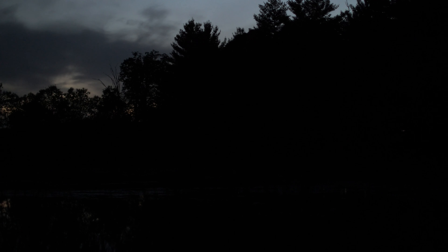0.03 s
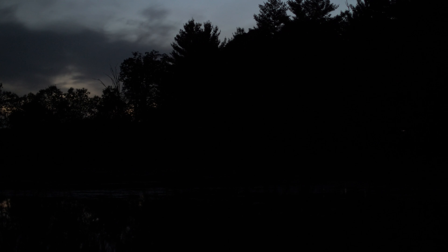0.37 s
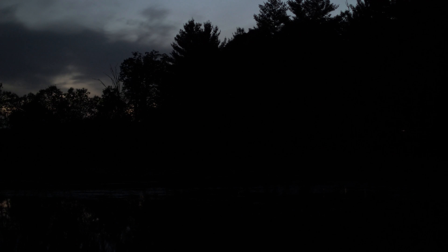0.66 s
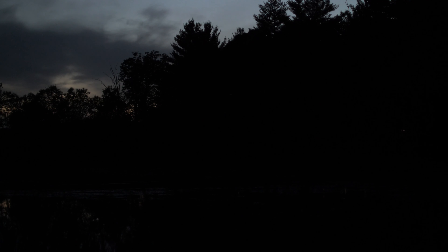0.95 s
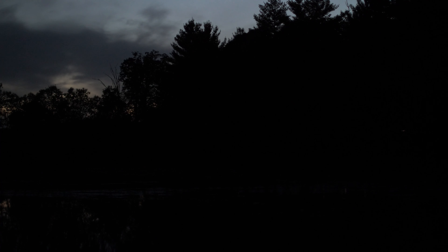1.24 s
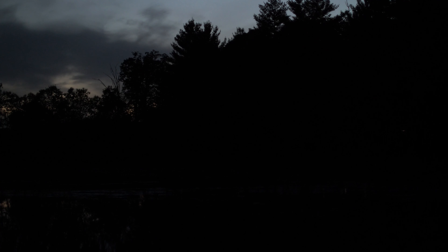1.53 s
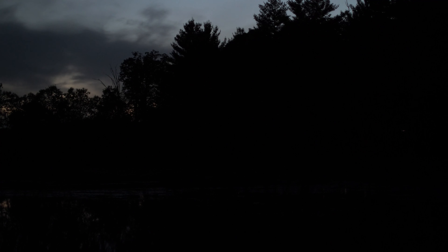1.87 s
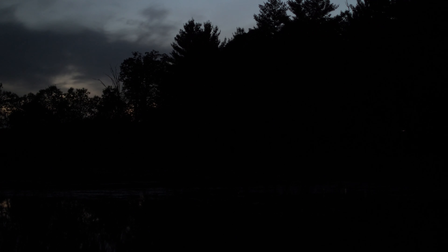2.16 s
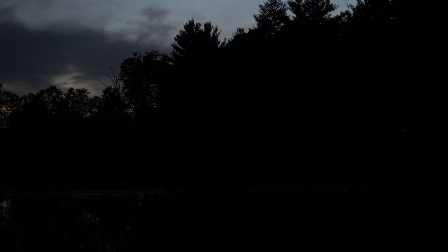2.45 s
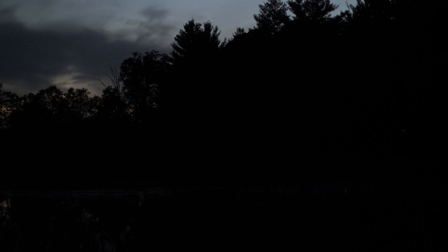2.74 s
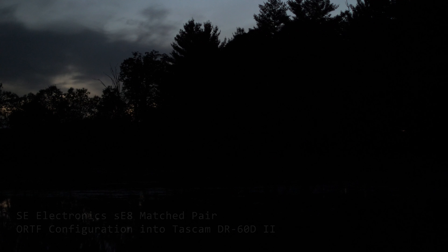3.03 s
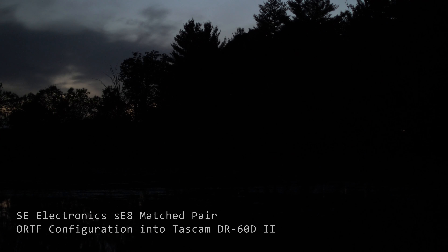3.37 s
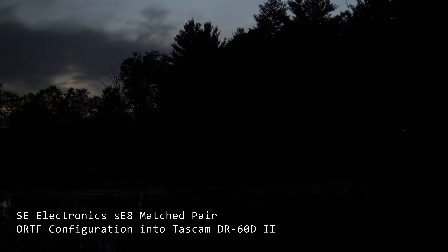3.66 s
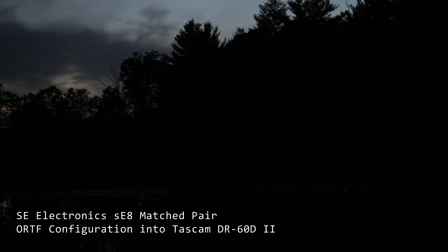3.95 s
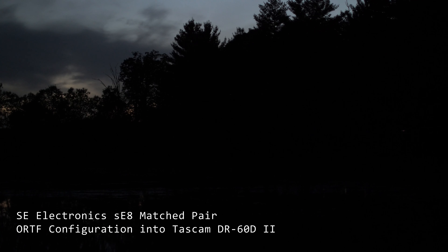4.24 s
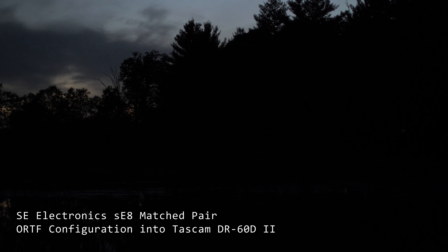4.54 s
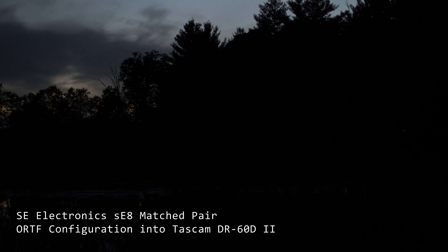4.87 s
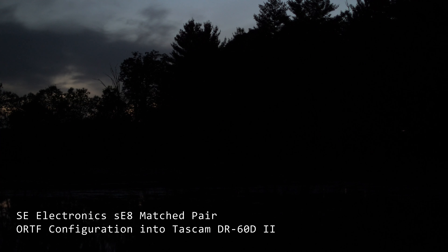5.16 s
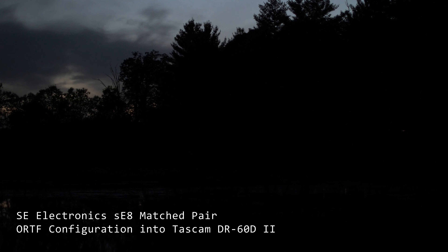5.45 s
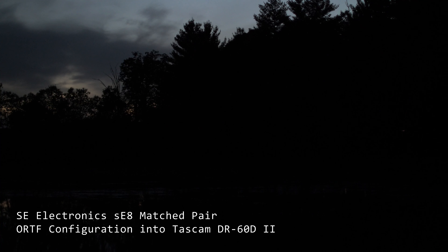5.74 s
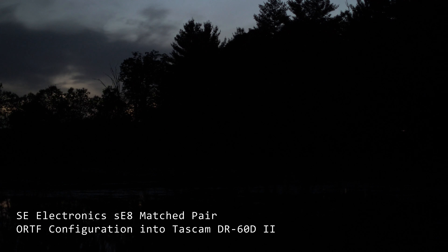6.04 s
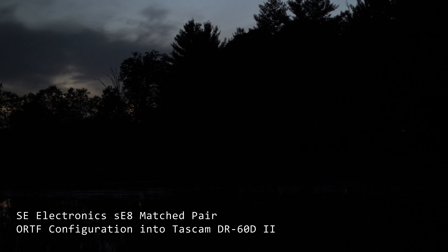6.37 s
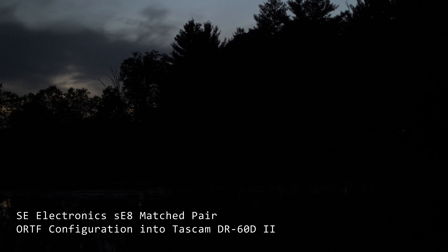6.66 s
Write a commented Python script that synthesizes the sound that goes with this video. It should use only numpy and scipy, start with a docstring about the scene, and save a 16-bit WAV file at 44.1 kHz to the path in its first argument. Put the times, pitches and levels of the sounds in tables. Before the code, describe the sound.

Near tree frogs trade pulsing trills and short upward whistles while a farther chorus swells and ebbs in still evening air.

```python
"""Tree frogs are already trilling across a wooded pond at dusk, over a distant rumble.
Each trill is a slowing train of short rising chirps. From the start the near frogs overlap, one gives
rising whistled weeps, and a far chorus swells and ebbs in bouts. Around 1 s a thin buzz comes and goes;
from about 3 s something hoots very faintly now and then. The frogs trill on to the end."""
import sys
import numpy as np
from scipy import signal
from scipy.fft import rfft, irfft
from scipy.io import wavfile

SR = 44100
rng = np.random.default_rng(int(sys.argv[2]) if len(sys.argv) > 2 else 0)


def store_wav(level_fs):
    """Save 16-bit WAV to argv[1]."""
    pcm = np.round(np.clip(np.atleast_2d(level_fs), -1, 1) * 32767)
    wavfile.write(sys.argv[1], SR, pcm.T.astype(np.int16))


N = 304290
TIME = np.arange(N) / SR

# Tone colour of a near frog's throat: f/Hz, level/dB
NEAR_THROAT = [(700, -23), (1000, -13), (1450, -10), (1750, -13), (2100, -2), (2400, 3.5), (2750, -6.5),
               (3100, -18), (3700, -21), (4200, -35.5), (4900, -32.5), (7200, -46.5), (9500, -45.5),
               (11000, -65), (15000, -70)]
# Near voices: level/dB, f/Hz, fundamental/dB, overtones/dB, upper throat resonance/dB, swell t/s
NEAR_VOICES = [ (-19, 1070, 1, 2, -4, .05), (-17.5, 1250, 2, -0.5, -5, 0.16),
               (-20.5, 1220, -7, 1.5, 6, 0.074), (-21.5, 1130, -3, -1.5, -1, 0.059),
               (-24, 1140, 3, 3.5, 2.5, 0.0175), (-18.5, 1185, 0.5, -1, 7, 0.09),
               (-19, 1170, -1, -0.5, -8.5, 0.13), (-15, 1130, -0.5, -5, 8.5, 0.26),
               (-22.5, 1300, -0.5, 1.5, 8.5, 0.085), (-24, 1400, -3, 0, -7, 0.1),
               (-18, 1400, 0, 0, -2, 0.044), ]
# Trill cues: first pulse t/s, last pulse t/s, pulse count, slowing (0-1), row of NEAR_VOICES
TRILL_CUES = [ (-.33, .078, 9, .05, 0), (.025, 1.601, 31, .2, 1), (.142, 1.174, 23, .13, 2),
              (1.372, 1.926, 11, .02, 3), (2.075, 2.735, 15, .15, 4), (2.152, 3.742, 32, .15, 5),
              (3.357, 4.651, 24, .02, 6), (3.49, 4.53, 20, .1, 3), (4.841, 6.17, 26, .16, 7),
              (5.08, 6.232, 22, .12, 8), (5.525, 6.147, 12, .02, 3), (6.268, 6.9, 13, .08, 9),
              (6.735, 7.33, 12, .1, 10), ]
def near_frogs(soft_start_db=-7, dull_start_db=-8, flat_start=0.0552, uneven_db=1, uneven_pitch=0.01485):
    """Each trill starts soft, dull and flat, and gains level, edge and pitch together."""
    out, pad_s = np.zeros(N), .1
    for first, last, pulses, slowing, frog in TRILL_CUES:
        db, hz, fundamental_db, overtones_db, upper_db, swell_s = NEAR_VOICES[frog]
        trill = np.zeros(int((last - first + 2 * pad_s) * SR))
        for s in pulse_times(0, last - first, pulses, slowing):
            slack = np.exp(-abs(s) / swell_s)
            louder, sharper, brighter = rng.standard_normal(3)
            pitch = hz * (1 - flat_start * slack + uneven_pitch * sharper)
            bright_db = overtones_db + dull_start_db * slack + uneven_db * brighter
            pulse = chirp(pitch, NEAR_THROAT, bright_db, upper_db, fundamental_db)
            gain = np.sqrt(2) * gain_of(db + soft_start_db * slack + uneven_db * louder)
            add(trill, pad_s + s - len(pulse) / SR / 2, gain * pulse)
        add(out, first - pad_s, bank_echoes(trill))
    return out


def pulse_times(first, last, count, slowing, jitter_s=.0007):
    """The pulses come quickly at first and spread out as the frog tires."""
    even = np.linspace(0, 1, int(round(count)))
    dragged = even + slowing * even * (np.sqrt(even) - 1)
    return first + (last - first) * dragged + jitter_s * rng.standard_normal(len(even))


def chirp(hz, throat, overtones_db=0, upper_db=0, fundamental_db=0,
          rise_s=.015, fall_s=.0095, glide_per_s=10, flick_per_s=5, rough=.011, edge_db=6):
    """One pulse, centred on its peak: it climbs and brightens as it swells, then flicks up as it shuts."""
    t = np.arange(-900, 900) / SR
    swell = np.exp(-(t / np.where(t < 0, rise_s, fall_s)) ** 2) * signal.windows.tukey(len(t), .3)
    glide = np.exp(glide_per_s * t + flick_per_s * np.maximum(t, 0))
    pitch = hz * glide * (1 + rough * wander(t, per_s=900))
    return swell * voice(pitch, throat, overtones_db + edge_db * (swell - .8), upper_db, fundamental_db)


def voice(hz, throat, overtones_db=0, upper_db=0, fundamental_db=0,
          upper_hz=8800, upper_width_hz=750, ceiling_db=-25):
    """Two strong harmonics and weak overtones, coloured by the throat and its upper resonance."""
    harmonic = np.arange(1, 10)[:, None]
    partial_hz = harmonic * hz
    db = level_at(throat, partial_hz) + fundamental_db * (harmonic == 1)
    db = np.where(harmonic > 2, np.minimum(db, ceiling_db) + overtones_db, db)
    db += upper_db / (1 + np.square(np.square((partial_hz - upper_hz) / upper_width_hz)))
    cycles = np.cumsum(hz) / SR + rng.random()
    return (gain_of(db) * np.sin(2 * np.pi * harmonic * cycles)).sum(0)


# Tone colour of a weep, where the mouth rings in two high bands: f/Hz, level/dB
WEEP_COLOUR = [(850, -15), (1100, -10), (1750, -6), (2150, 2), (2800, -23.5), (3300, -28), (4300, -41.5),
               (5200, -28), (6000, -49), (7600, -53), (8500, -36), (9500, -59)]
# Weep cues: t/s, length/s, first f/Hz, last f/Hz, level/dB
WEEP_CUES = [ (0.027, 0.092, 857, 1068, -34.5), (0.792, 0.14, 898, 1074, -29.5),
             (1.186, 0.14, 900, 1121, -29.5), (1.613, 0.13, 915, 1149, -26.5),
             (3.423, 0.16, 905, 1077, -30.5), (3.869, 0.15, 905, 1082, -28),
             (4.304, 0.135, 892, 1120, -30.5), (6.575, 0.16, 930, 1000, -31), ]
def weeps(rough=0.02):
    """Drawn-out whistles that bend upward, given to a rival."""
    out = np.zeros(N)
    for s, length, first_hz, last_hz, db in WEEP_CUES:
        t = np.arange(0, length, 1 / SR)
        bend = first_hz + (last_hz - first_hz) * (t / length) ** 1.1
        hz = bend * (1 + rough * wander(t, per_s=450))
        add(out, s, faded(voice(hz, WEEP_COLOUR, ceiling_db=-19.5), db))
    return out


# Rasp in the far voices: f/Hz, relative level/dB
RASP_SPECTRUM = [(550, -55), (780, -17.5), (1000, 7.5), (1400, -8), (1700, -1), (2400, -6), (3100, -8.5),
                 (3650, -9), (4200, -18.5), (5000, -22), (7000, -29.5), (10000, -34.5), (15000, -54.5)]
def far_chorus(direct_db=-2, rasp_db=-18):
    """Two groups of far frogs, each blurred by its own stretch of woods, swell and ebb together."""
    groups = [far_frogs() for _ in range(2)]
    blend = sum(gain_of(direct_db) * group + woods_echoes(group, t60=.68, delay_s=.03, dull_hz=4600)
                for group in groups)
    return bout_level() * (unit_rms(blend) + gain_of(rasp_db) * noise(RASP_SPECTRUM))


# Tone colour of a throat heard through the trees: f/Hz, level/dB
FAR_COLOUR = [(750, -20.5), (1000, -11.5), (1200, -9.5), (1400, -6), (1700, -13), (2050, -2.5), (2350, 3),
              (2600, -6), (3000, -18.5), (3650, -23), (4200, -42), (5000, -42.5), (7000, -49.5),
              (10000, -59.5)]
def far_frogs(count=8, mid_hz=1200, spread_hz=140, spread_db=2):
    """A group of frogs that trill and rest in turn, each trill on its own pitch."""
    out = np.zeros(N)
    for start in -1.5 * rng.random(count):
        for stretch, rest, pace, size, up, down in rng.random((5, 6)):  # five trills a frog
            length_s, pulses_per_s = 1.1 + .7 * stretch, 17.5 + 3 * pace
            gain = gain_of(spread_db * (2 * size - 1))
            pulse = gain * chirp(mid_hz + spread_hz * (up - down), FAR_COLOUR)
            times = pulse_times(start, start + length_s, length_s * pulses_per_s, slowing=.13)
            for s in times[times < TIME[-1]].tolist():
                add(out, s, pulse)
            start += length_s + .2 + .5 * rest
    return unit_rms(out)


# Bouts in which the far frogs set each other off: start t/s, end t/s, level/dB
BOUT_CUES = [(0.22, 1.548, -22.5), (2.106, 2.942, -22), (3.31, 4.542, -23), (4.988, 6.094, -23.5),
             (6.5, 7.3, -23.5)]
def bout_level(lull_db=-26, join_s=.28, drop_out_s=.13):
    """The chorus fader: frogs join in, hold and drop out, above those that call through the lulls."""
    lull = gain_of(lull_db)
    level = np.full(N, lull)
    for start, end, db in BOUT_CUES:
        calling = np.clip((TIME - start) / join_s, 0, 1) * np.clip(1 - (TIME - end) / drop_out_s, 0, 1)
        level += calling * (gain_of(db) - lull)
    return level


def bank_echoes(dry, echo_db=-5.5, spread_s=.025, count=9):
    """A few quick slaps off water and reeds, different for each trill."""
    taps = np.zeros(SR // 10)
    lateness = rng.random(count) ** 1.5
    at = ((.001 + spread_s * lateness) * SR).astype(int)
    slaps = rng.choice([-1, 1], count) * np.exp(-lateness)
    taps[at] = gain_of(echo_db) * unit_rms(slaps) / np.sqrt(count)
    taps[0] = 1  # the direct sound
    return signal.oaconvolve(dry, taps)


def woods_echoes(dry, t60, delay_s, dull_hz):
    """Sparse reflections from trunks and leaves, which lose treble on the way."""
    t = np.arange(SR) / SR
    taps = rng.standard_normal(SR) * (rng.random(SR) < 2500 / SR)  # about 2500 a second
    taps *= gain_of(-60 * t / t60)
    taps = np.concatenate([np.zeros(int(delay_s * SR)), taps / np.linalg.norm(taps)])
    return signal.lfilter(*signal.butter(1, dull_hz, fs=SR), signal.oaconvolve(dry, taps)[:N])


# Hoot cues: t/s, length/s, first f/Hz, last f/Hz, level/dB
HOOT_CUES = [(2.819, 0.098, 437, 350, -69), (3.376, 0.17, 372, 343, -76), (3.975, 0.14, 362, 337, -78.5),
             (6.695, 0.1, 414, 362, -69)]
def hoots():
    """Faint falling notes from far off."""
    out = np.zeros(N)
    for s, length, first_hz, last_hz, db in HOOT_CUES:
        hz = np.linspace(first_hz, last_hz, int(length * SR))
        add(out, s, faded(sine(hz), db, taper=.6))
    return out


# Buzz cue: start t/s, end t/s, f/Hz, level/dB at the top of a throb
BUZZ_CUE = (.62, 1.65, 9659.5, -63.5)
def buzz(throbs_per_s=17):
    """A thin, high, throbbing line, perhaps an insect."""
    start, end, hz, db = BUZZ_CUE
    throb = np.abs(np.sin(np.pi * throbs_per_s * (TIME - start)))
    return throb * wavering_tone(start, end, hz, db, waver=.014, per_s=900)


# Drone cues: start t/s, end t/s, f/Hz, level/dB
DRONE_CUES = [(-.3, 0.64, 124.6, -72), (-.3, 1.3, 152, -77), (1.2, 4.3, 215.2, -76.5),
              (1.399, 3.6, 259, -84.5), (4.1, 5.2, 158.4, -76), (5.001, 6.1, 111.2, -81)]
def drones():
    """Faint low hums come and go in the distance."""
    return sum(wavering_tone(*cue, waver=.023, per_s=97) for cue in DRONE_CUES)


# Bed of still air and distant rumble: f/Hz, relative level/dB
AIR_SPECTRUM = [(25, -23), (50, -8.5), (90, -7), (125, 1), (160, 0.5), (190, -6), (300, -11.5),
                (600, -21.5), (1500, -14.5), (4000, -14.5), (7000, -20), (11000, -20), (15500, -21)]
def air(air_db=-66, drift_db=1.1):
    """Distant rumble and soft hiss, drifting gently in level."""
    return gain_of(air_db + drift_db * wander(TIME, per_s=1.8)) * noise(AIR_SPECTRUM)


def wavering_tone(start, end, hz, db, waver, per_s):
    """A track holding one unsteady tone that fades in and out."""
    out, t = np.zeros(N), np.arange(start, end, 1 / SR)
    add(out, start, faded(sine(hz * (1 + waver * wander(t, per_s))), db))
    return out


def sine(hz):
    """A pure tone that follows a pitch curve."""
    return np.sin(2 * np.pi * np.cumsum(hz) / SR)


def faded(sound, db, taper=.4):
    """Fades both ends; between the fades a unit sine has an rms level of db."""
    return np.sqrt(2) * gain_of(db) * signal.windows.tukey(len(sound), taper) * sound


def noise(spectrum):
    """Steady coloured noise with an rms of 1."""
    colour = gain_of(level_at(spectrum, np.fft.rfftfreq(N, 1 / SR)))
    return unit_rms(irfft(rfft(rng.standard_normal(N)) * colour, N))


def wander(t, per_s):
    """Random modulation of size about 1, with per_s turning points a second."""
    knots = rng.standard_normal(int((t[-1] - t[0]) * per_s) + 3)
    return 1.2 * np.interp((t - t[0]) * per_s, np.arange(len(knots)), knots)


def level_at(spectrum, hz):
    """An EQ curve in dB, joined on a log-frequency axis."""
    f, db = np.transpose(spectrum)
    return np.interp(np.log(hz + 1), np.log(f + 1), db)


def gain_of(db):
    """Decibels to amplitude."""
    return np.exp(np.asarray(db) * np.log(10) / 20)


def unit_rms(x):
    """Scaled to an rms of 1."""
    return x / np.sqrt(np.mean(x ** 2) + 1e-20)


def add(mix, s, sound):
    """Lays a sound into the mix from time s on."""
    at = round(s * SR)
    sound = sound[max(-at, 0):]
    part = mix[max(at, 0):][:len(sound)]
    part += sound[:len(part)]


def scene(near_db=-1.18, woods_db=-11.0):
    """Single calls with a soft tail from the woods, over the chorus and the evening air, in mono."""
    calls = gain_of(near_db) * near_frogs() + weeps() + hoots()
    tail = gain_of(woods_db) * woods_echoes(calls, t60=.6, delay_s=.018, dull_hz=10000)
    return (calls + tail + far_chorus() + air() + drones() + buzz())[None]


def record(dry):
    """A steep low-pass trims the top above 15750 Hz."""
    low_pass = signal.firwin(511, 15750, window=("kaiser", 9), fs=SR)
    return signal.oaconvolve(dry, low_pass[None], "same")


dry = scene()
out = record(dry)
store_wav(out)
```